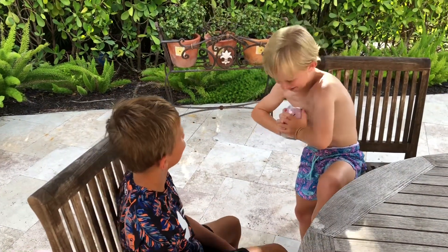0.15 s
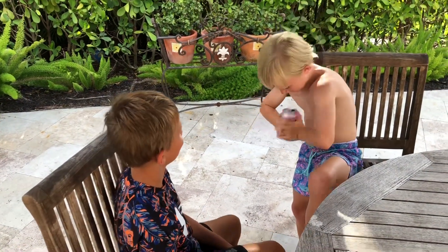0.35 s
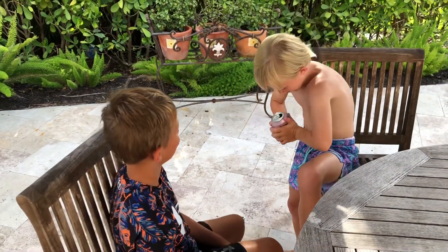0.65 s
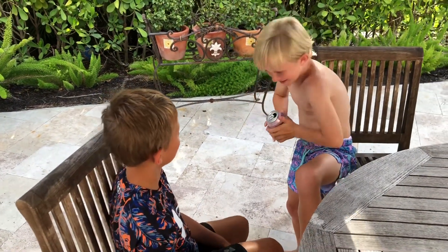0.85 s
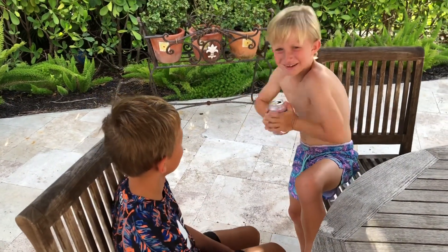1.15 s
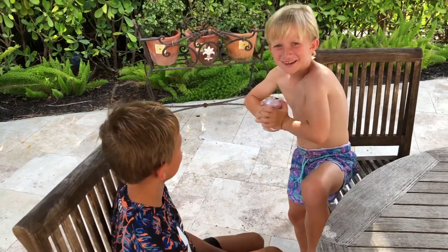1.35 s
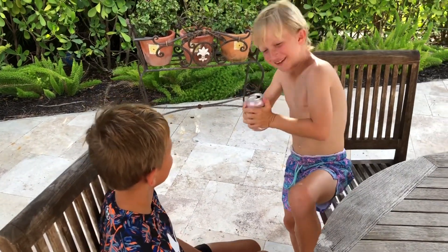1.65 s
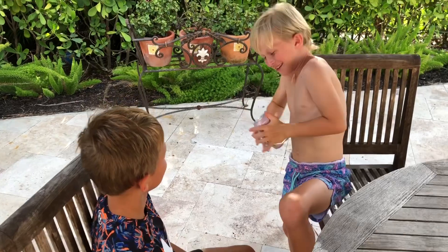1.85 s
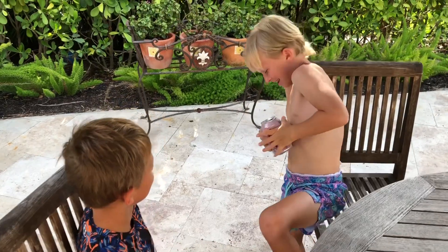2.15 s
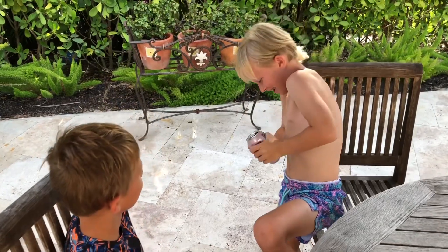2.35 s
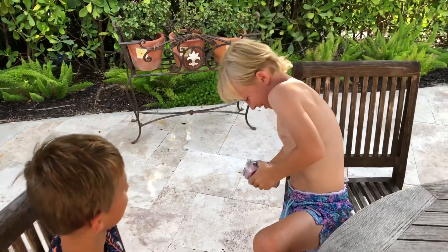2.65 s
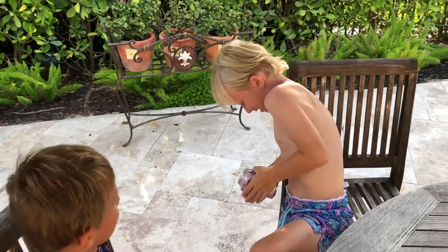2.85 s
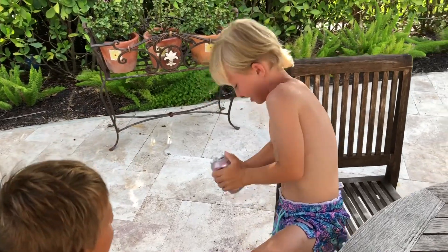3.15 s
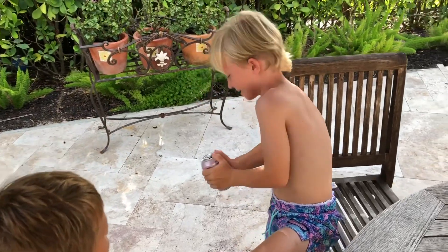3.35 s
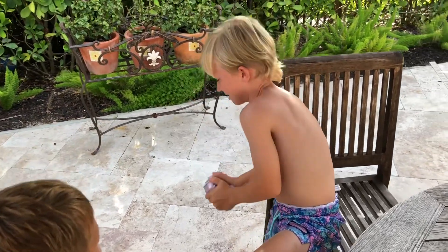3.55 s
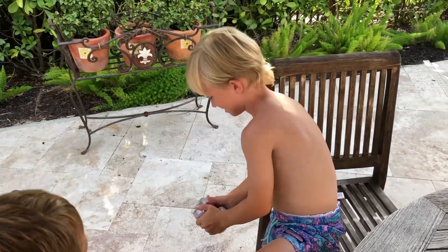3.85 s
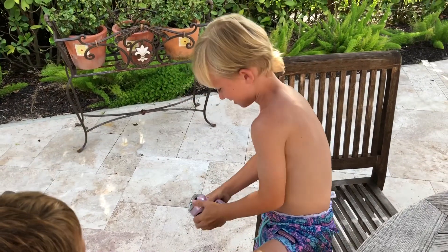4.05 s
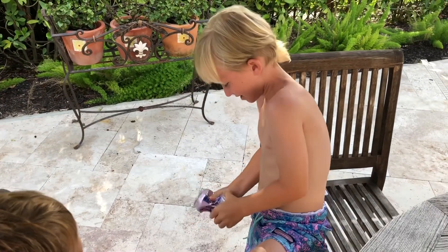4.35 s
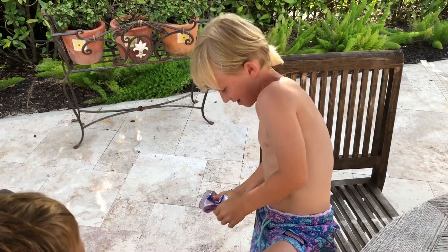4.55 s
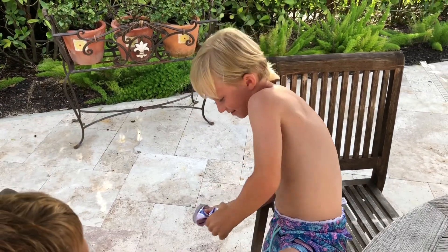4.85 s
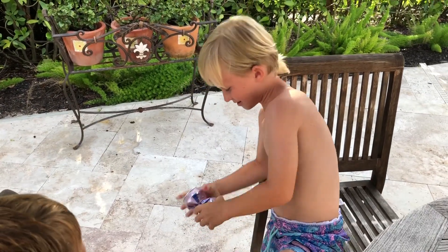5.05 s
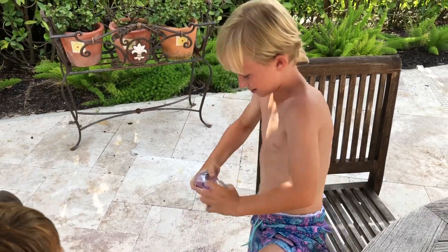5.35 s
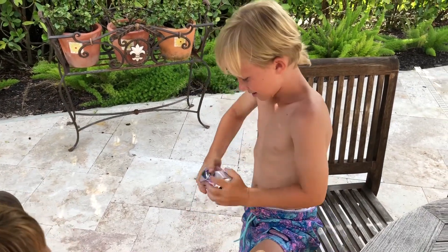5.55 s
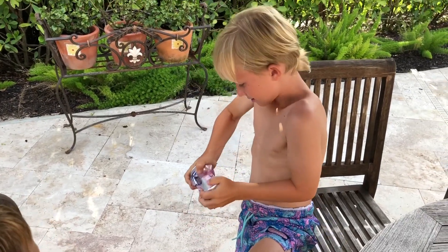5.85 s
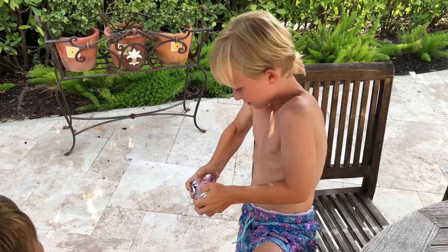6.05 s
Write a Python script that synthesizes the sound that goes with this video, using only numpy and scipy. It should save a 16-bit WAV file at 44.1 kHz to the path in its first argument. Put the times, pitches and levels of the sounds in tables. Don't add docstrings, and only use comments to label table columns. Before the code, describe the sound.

Outdoors on a paved patio, fingers buckle a light aluminium can. Irregular sharp clicks and crinkles thicken into a loud crackling crush, with dented panels ringing briefly and a short rub of skin on metal. After a gap the flattened can is folded with quick snaps, then only small ticks and a few pops remain. Phone pickup from a couple of metres, slight yard echo, distant motor hum, rumble, wind thumps and thin birdsong.

```python
import sys
import numpy as np
from scipy import signal
from scipy.fft import rfft, irfft
from scipy.io import wavfile
from scipy.ndimage import uniform_filter1d

SR = 44100
rng = np.random.default_rng(int(sys.argv[2]) if len(sys.argv) > 2 else 0)


def boost(x):
    u = np.asarray(x, float) / 20
    return 10 ** u


def wrap_up_sound(samples):
    columns = np.atleast_2d(samples).T
    tamed = np.clip(columns, -1, 1)
    steps = np.round(tamed * 32767).astype(np.int16)
    wavfile.write(sys.argv[1], SR, steps)


N = 273759
LEAD_S = .1
LEVEL_SAMPLES = 300

# start in seconds, tear length in seconds, body level in dB,
# edge level in dB, level of the air in the can in dB.
PRESSING_BUCKLES = [(-.012, .009, -31, -21.5, -60), (.0655, .014, -41, -35, -50),
                    (.082, .011, -36, -27.5, -40.5), (0.1400, 0.0064, -33, -21, -36),
                    (0.3662, 0.0028, -42, -23.5, -41), (.8249, .0052, -27, -22.5, -50),
                    (.8688, .007, -38, -41, -41), (.9137, 0.0083, -33, -34, -35.5),
                    (1.0856, 0.0059, -34, -32, -46), (1.3082, .013, -46.5, -72, -42),
                    (1.3316, .0056, -52, -39, -66), (1.3774, 0.0051, -44.5, -27.5, -38.5),
                    (1.4238, .007, -32, -21, -27.5), (1.5427, 0.011, -35, -30, -36),
                    (1.7625, .015, -27, -17.5, -32), (1.938, 0.021, -27.5, -29.5, -54.5)]
CRUSHING_BUCKLES = [(2.0685, 0.015, -25.5, -36, -60), (2.0885, 0.016, -44, -22.5, -40),
                    (2.1025, .019, -21, -29, -25), (2.1192, .012, -21.5, -22.5, -33),
                    (2.1507, 0.0078, -33, -37, -41), (2.1614, .027, -30, -32.5, -40),
                    (2.1842, .017, -28, -27, -35), (2.2412, .01, -23, -21.5, -33),
                    (2.259, 0.039, -22, -28, -31), (2.282, .02, -36, -34, -43),
                    (2.4014, .01, -40, -33.5, -45.5), (2.457, .02, -31, -48, -60),
                    (2.4606, .014, -19, -21.5, -31), (2.477, .023, -31, -21, -32),
                    (2.4944, .012, -38, -38, -40)]
FOLDING_BUCKLES = [(3.2274, 0.019, -32.5, -25.5, -35.5), (3.2665, .0042, -51, -19, -59.5),
                   (3.2767, .021, -37, -31, -39), (3.3284, 0.008, -22, -52, -23),
                   (3.37, .016, -31, -44, -33), (3.3787, 0.0086, -31, -31, -32),
                   (3.4225, .0087, -59, -33.5, -65), (3.5012, 0.017, -37, -30.5, -42),
                   (4.3066, .019, -52, -29, -47.5), (5.12, .015, -59, -59, -75),
                   (5.5905, .008, -65, -54, -74.5), (6.1134, .0064, -46, -35, -65)]
TOP_DROPS_DB = (9, 10, 15.5)
# start in seconds, body level in dB,
# crease level in dB.
CRINKLES = [(.0858, -45, -30), (1.766, -50.5, -30), (1.7944, -40, -32), (1.9263, -40, -49),
            (2.0078, -38, -43), (2.2525, -45.5, -31), (2.2695, -45, -36), (2.5727, -50, -34),
            (3.231, -34.5, -31.5), (3.5802, -54, -42), (-.012, -56, -30), (.1406, -40, -22),
            (3.3785, -50, -35), (3.5011, -50, -39), (4.3075, -44, -29), (6.1134, -55, -34),
            (1.3082, -56, -47), (1.3316, -60, -39), (2.1507, -44, -28), (2.0685, -45, -33)]
TICKS = [(.258, -58, -55), (.356, -35, -60), (.4067, -41, -58), (.437, -38.5, -60), (.543, -44, -62),
         (.5, -50, -64), (.8, -53, -62), (.8169, -42, -50), (.982, -45, -77), (1.0516, -43, -52),
         (1.1828, -38.5, -51.5), (1.2228, -52, -53), (3.011, -49.5, -71), (3.69, -51, -61),
         (3.727, -56, -58), (4.03, -63, -61), (4.178, -61, -60.5), (4.2883, -46, -74), (4.4148, -43, -62),
         (4.5834, -58, -57.5), (5.8379, -42, -49)]
NAIL_GRAZES = [(.79, -63, -63), (2.9504, -53, -60), (3.3163, -42, -62.5), (3.3561, -58, -66),
               (3.6343, -46, -58), (3.8521, -48.5, -54), (5.013, -52, -59), (5.38, -71, -62)]
ZONES_HZ = (1500, 4500, 8500, 13500)
ZONE_WIDTHS_HZ = (2250, 3500, 4500, 5000)

# start in seconds, pitch in Hz, level in dB.
PANELS = [(.0855, 2620, -39), (0.14, 2830, -32), (0.3663, 1560, -40), (.8249, 1593, -24.5),
          (.9141, 1640, -37.5), (1.7624, 3030, -25), (1.764, 2490, -28), (1.796, 1640, -37),
          (1.9263, 1490, -41), (1.938, 1210, -23.5), (2.0889, 1940, -32), (2.1033, 1184, -22),
          (2.1495, 1134, -34), (2.1612, 1685, -26.5), (2.1842, 1580, -31.5), (2.2419, 2240, -20.5),
          (2.2516, 1060, -24.5), (2.259, 1664, -34), (2.283, 1030, -38), (2.4023, 1970, -36),
          (2.4608, 1176, -14.5), (2.4948, 1230, -24.5), (3.231, 1650, -29.5), (3.2668, 2750, -38),
          (3.2771, 980, -33), (3.328, 846, -29), (3.37, 1125, -32), (3.3787, 1710, -40),
          (4.2885, 1640, -44), (6.1134, 2840, -36)]
# start in seconds, pitch in Hz, level in dB.
FACETS = [(.0655, 3080, -35), (.082, 3160, -29.5), (.085, 3370, -29.5), (.082, 11000, -33),
          (.8247, 5800, -27.5), (1.087, 1550, -35.5), (1.0858, 5700, -32), (1.183, 1710, -38.5),
          (1.3771, 9370, -35), (1.5428, 1630, -32), (1.5425, 4700, -35), (1.7626, 2460, -18.5),
          (1.7645, 8300, -21), (1.765, 4940, -26.5), (1.794, 4090, -34.5), (1.94, 5280, -32.5),
          (2.0889, 10700, -31), (2.0685, 3190, -28.5), (2.0685, 8000, -29), (2.0889, 3950, -30.5),
          (2.12, 1400, -18), (2.1195, 7070, -27.5), (2.4606, 9400, -26), (2.4768, 900, -18.5),
          (2.4768, 10700, -24.5), (3.2665, 7360, -24.5), (3.379, 4500, -28.5), (3.3788, 10040, -32.5),
          (4.307, 9630, -27), (6.1133, 3444, -19)]
# start in seconds, pitch in Hz, level in dB.
SETTLING_DENTS = [(.150, 2130, -40), (.3775, 1690, -44), (.416, 480, -45), (.868, 2130, -43),
                  (.9145, 4270, -41), (1.0865, 2690, -38), (1.332, 5850, -42), (1.392, 720, -48),
                  (1.436, 1100, -43), (1.443, 680, -42), (1.5425, 1070, -38), (1.559, 4700, -43),
                  (1.782, 4270, -38), (1.7945, 2130, -38), (2.1195, 1050, -25), (2.139, 6800, -42),
                  (2.245, 450, -38), (2.264, 450, -37), (2.271, 1070, -32), (2.281, 2600, -38),
                  (2.299, 440, -42), (2.299, 1070, -41), (2.363, 1690, -49), (2.4605, 1700, -24),
                  (2.479, 440, -31), (2.4775, 2100, -27), (2.511, 850, -38), (2.518, 1050, -41),
                  (2.528, 1300, -43), (2.538, 850, -45), (2.549, 2050, -45), (2.556, 1250, -46),
                  (2.562, 950, -41), (2.583, 1250, -46), (3.232, 450, -38), (3.231, 2800, -33),
                  (3.279, 1250, -37), (3.3283, 1700, -25), (3.354, 850, -39), (3.380, 450, -32),
                  (3.3788, 2800, -41), (3.502, 4270, -36), (4.3068, 1750, -40), (4.3075, 6500, -30),
                  (4.309, 7400, -33), (4.324, 6200, -47), (4.326, 3450, -39), (4.333, 3450, -37),
                  (6.1235, 3400, -41), (6.132, 3450, -41), (6.1135, 5500, -35), (.0665, 6200, -38),
                  (.8685, 7800, -36), (3.379, 13500, -40), (3.4225, 13500, -42)]
# start in seconds, pitch in Hz, level in dB.
FLIPS = [(.1406, 4000, -19.5), (.3664, 11000, -24.5), (2.1196, 1800, -24), (2.2418, 2400, -25),
         (2.4612, 2600, -21), (3.3787, 6000, -32), (4.3074, 4000, -24), (2.1045, 10700, -30)]
# start in
# seconds, pitch in Hz, level in dB, # t60 in seconds.
PINGS = [(.916, 1630, -35.5, .11), (2.462, 2085, -23.5, .05), (4.309, 3580, -30, 0.064),
         (4.416, 484, -45, 0.08), (4.5829, 2030, -48, 0.017), (2.9501, 457, -40.5, .022),
         (3.356, 543, -38, .032), (3.6333, 506, -38, .03), (3.8526, 470, -43.5, .047),
         (5.8372, 403, -44, .04), (2.0081, 2256, -27, 0.0091), (4.3073, 3560, -14, .009),
         (2.1844, 950, -28, .015), (2.1034, 1800, -25, .012), (3.3284, 2050, -30, .007),
         (3.2769, 3480, -33, .015), (1.4238, 1000, -34, .02), (2.0889, 1000, -38, .02),
         (1.7626, 1100, -30, .012), (1.7626, 6800, -21, .008), (2.1612, 2900, -33, .01),
         (3.3787, 4700, -36, .006), (1.3085, 1000, -43, .03), (5.838, 950, -42, .03),
         (1.5422, 9600, -28.5, .008), (2.2433, 8900, -23, .01), (2.0081, 1800, -33, .01),
         (6.1137, 6300, -32, .008), (6.118, 3460, -38, .09)]
# start in seconds, pitch in Hz,
# level in dB, t60 in seconds.
MORE_PINGS = [(.1402, 1750, -38, .01), (.082, 2300, -38, .01), (.066, 1600, -46, .012),
              (1.3085, 6000, -46, .008), (1.552, 1300, -48, .02), (1.434, 1700, -48, .02),
              (1.7626, 3750, -26, .008), (2.1195, 2300, -30, .008), (2.161, 2300, -36, .01),
              (2.242, 1000, -27, .012), (2.2418, 1750, -29, .008), (3.277, 720, -42, .02),
              (3.3285, 720, -29, .02), (3.3285, 2900, -39, .006), (3.3285, 2350, -34, .006),
              (3.371, 720, -41, .02), (3.379, 1750, -35, .01), (3.502, 2950, -42, .01),
              (3.634, 720, -46, .02), (4.289, 480, -50, .03), (4.2885, 1600, -39, .014),
              (4.3072, 3000, -24, .006), (4.415, 750, -50, .02), (2.403, 1000, -48, .015),
              (2.402, 2950, -48, .01), (1.795, 900, -47, .015), (1.087, 470, -44, .025),
              (3.266, 480, -51, .025)]
# start in seconds, low edge in Hz, high edge in Hz,
# level in dB, t60 in seconds.
SHIVERS = [(.146, 2600, 15000, -29, .12), (.375, 2200, 6500, -42, .12), (1.549, 4200, 15000, -41, .16),
           (1.769, 3300, 5400, -37, .08), (2.29, 1900, 2700, -46, .3), (3.369, 5400, 15000, -36, .05),
           (4.314, 4000, 15000, -40, .2), (-.03, 5200, 8000, -39, .25), (.825, 5500, 9500, -38, .1),
           (.141, 3300, 5400, -27, .06), (.16, 4000, 5800, -42, .4), (4.308, 2800, 4500, -27, .05),
           (4.32, 3000, 4300, -42, .15), (2.262, 900, 2700, -35, .1), (2.295, 900, 2600, -45, .35),
           (2.5, 4000, 15000, -46, .2), (1.542, 10000, 15500, -40, .1), (.37, 9500, 15500, -40, .12),
           (4.995, 6000, 12000, -62, .3), (4.04, 1200, 4000, -58, .6), (3.335, 450, 1100, -42, .3)]
# loudest moment in seconds, level in dB, rise in seconds,
# fall in seconds.
SLIDES = [
    (2.54, -44, .02, .05),
    (2.95, -70.5, .3, .4),
    (3.52, -70, .01, .3),
    (4.1, -54, .05, .04),
    (4.19, -60.5, 0.076, .035),
    (5.025, -56, .035, .025),
]

# delay in seconds, level in dB.
NEAR_ECHOES = [(.0022, -18.5), (.0045, -17.5), (0.0111, -22.5)]
# low edge in Hz, high edge in Hz, t60 in seconds, share of amplitude.
YARD_BANDS = [(349, 1800, 0.54, 1.3), (2680, 7600, 0.42, 1.2), (6530, 18000, 0.33, 1.1),
              (4200, 5500, .5, 1.1), (1400, 2700, .5, .8)]

# start in seconds, end in seconds, start pitch in Hz, end pitch in Hz,
# level in dB.
WHISTLES = [
    (0.637, .83, 6070, 6150, -69.5),
    (1.175, 1.42, 6070, 5900, -64),
    (5.255, 5.37, 5750, 5760, -69),
    (5.35, 5.48, 6430, 6320, -72),
    (6.077, 6.125, 5770, 5900, -58),
    (6.118, 6.4, 5930, 6000, -46.5),
]
# delay in seconds, level in dB.
HEDGE_ECHOES = [(.013, -2), (.031, -4), (.052, -7)]
# time in seconds, peak level in dB, pitch in Hz,
# length in seconds.
BUMPS = [
    (1.798, -32.5, 78, 0.02),
    (2.056, -41.5, 65, 0.14),
    (2.805, -31.5, 123.6, 0.019),
    (4.835, -32.5, 99.3, 0.022),
    (5.244, -39.5, 65, .035),
    (5.95, -42.5, 151, 0.019),
    (5.982, -36.5, 83, 0.037),
    (6.138, -38, 96.7, 0.029),
]
# frequency in Hz, level in dB per Hz.
TOWN_SPECTRUM = [(15, -36), (25, -8), (114, -0.5), (142, -4.5), (177, -8), (288, -9.5), (480, -10),
                 (700, -12), (1030, -14.5), (1390, -19.5), (1880, -24.5), (2330, -29.5), (3910, -33),
                 (6210, -35), (7110, -39), (15200, -46.5), (16500, -56)]
# time in seconds, level in dB.
RUMBLE_DRIFT = [(0.0, -57), (0.47, -52), (0.62, -58.5), (0.79, -53.5), (1.24, -51), (1.47, -49.5),
                (1.57, -50.5), (1.99, -45), (2.14, -49.5), (3.29, -50.5), (3.61, -54), (4.03, -52),
                (4.13, -54), (5.08, -51), (5.69, -52.5), (6.21, -42.5)]
# centre in Hz, width in Hz, level in dB.
MOTOR = [(116.7, 9.6, -53.5), (78, 14, -55), (1060, 30, -66)]


def band(x, low_hz, high_hz, order=2):
    sos = signal.butter(order, [low_hz, min(high_hz, .47 * SR)], "band", fs=SR, output="sos")
    return signal.sosfilt(sos, x)


def level(x, db):
    return x * boost(db) / np.sqrt(np.mean(x ** 2))


def decay(t, t60_s):
    return np.exp(-np.log(1000) * t / t60_s)


def walk(rate_hz):
    k = int(SR / rate_hz)
    steps = np.repeat(rng.standard_normal(N // k + 1), k)
    return 4.2 * uniform_filter1d(uniform_filter1d(steps, k), k)[:N]


def add(track, s, x):
    i = int((s + LEAD_S) * SR)
    track[i:i + len(x)] += x


def can():
    direct, around = np.zeros((2, N + SR))
    snaps = buckle_snaps() + crease_snaps()
    for (s, length_s, *zones_db), noise in zip(snaps, rng.standard_normal((len(snaps), 1024))):
        snap, colour = tear(length_s, zones_db, noise)
        add(direct, s + .0004, boost(1.5) * snap)
        add(around, s, colour)
    for s, hz, db, t60_s in air_rings() + wall_rings():
        add(direct, s, ring(hz, t60_s, db + 0.5))
        add(around, s, ring(hz, 0.6 * t60_s, db - 3.5 - hz / 800))
    return direct, around


def buckle_snaps():
    body_share, crease_db = 0.35, -4
    top_per_db, usual_edge_db = .35, -26
    snaps = []
    for table, drop_db in zip((PRESSING_BUCKLES, CRUSHING_BUCKLES, FOLDING_BUCKLES), TOP_DROPS_DB):
        for s, length_s, body_db, edge_db, _ in table:
            middle_db = body_share * body_db + (1 - body_share) * edge_db + crease_db
            top_db = edge_db - drop_db + top_per_db * np.clip(edge_db - usual_edge_db, -12, 2)
            snaps.append((s, length_s, body_db, middle_db, edge_db, top_db))
    return snaps


def crease_snaps():
    snaps = []
    for table, length_s, fall_db in ((CRINKLES, .011, 15), (TICKS, .012, 17.5), (NAIL_GRAZES, 0.018, 7)):
        for s, body_db, crease_db in table:
            snaps.append((s, length_s, body_db, crease_db, crease_db - fall_db, crease_db - 2 * fall_db))
    return snaps


def tear(length_s, zones_db, noise, count=8):
    n = len(noise)
    t = np.arange(n) / SR
    crack = 0.013 / length_s * np.exp(-t / 0.00091)
    trail = .5 * np.exp(-t / (0.33 * length_s))
    burst = noise * (1 - np.exp(-t / .0002)) * (crack + trail)
    burst[count] += 2.3 * (0.0079 / length_s) ** 2
    burst /= np.sqrt(np.sum(burst ** 2))
    hz = np.arange(n + 1) * SR / (2 * n) + 1
    density_db = np.array(zones_db) - 10 * np.log10(2 * np.array(ZONE_WIDTHS_HZ) / SR / LEVEL_SAMPLES)
    colour_db = np.interp(np.log(hz), np.log(ZONES_HZ), density_db)
    colour_db = colour_db - 10 * np.log10(1 + (900 / hz) ** 4)
    cepstrum = irfft(colour_db * np.log(10) / 20)
    cepstrum[1:n] *= 2
    cepstrum[n + 1:] = 0
    colour = np.exp(rfft(cepstrum))
    return irfft(rfft(burst, 2 * n) * colour), irfft(colour)


def air_rings():
    air_hz, spread, t60_s, lag_s = 490, 0.05, 0.03, .0005
    buckles = PRESSING_BUCKLES + CRUSHING_BUCKLES + FOLDING_BUCKLES
    pitch = air_hz * (1 + spread * rng.uniform(-1, 1, len(buckles)))
    return [(row[0] + lag_s, hz, row[4], t60_s) for row, hz in zip(buckles, pitch)]


def wall_rings():
    rings = [(s, hz, db, .05 * (1100 / hz) ** 0.99) for s, hz, db in PANELS]
    rings += [(s, hz, db, 0.01) for s, hz, db in FACETS]
    rings += [(s, hz, db, .025 * (1100 / hz) ** .4) for s, hz, db in SETTLING_DENTS]
    rings += [(s, hz, db, .002) for s, hz, db in FLIPS]
    return rings + PINGS + MORE_PINGS


def ring(hz, t60_s, db):
    t = np.arange(3000) / SR
    wall_rise_s, air_rise_s, air_edge_hz = .00043, .003, 640
    rise_s = min(wall_rise_s, .1 * t60_s) + air_rise_s / (1 + (hz / air_edge_hz) ** 8)
    fade = decay(t, t60_s) * (1 - np.exp(-t / rise_s))
    partner = 0.35 * fade * np.sin(2 * np.pi * 1.1 * hz * t)
    y = fade * (np.sin(2 * np.pi * hz * t) + partner)
    return y * boost(db) / np.sqrt(np.sum(y ** 2) / LEVEL_SAMPLES)


def yard(direct, around):
    t = np.arange(SR // 2) / SR
    tail = np.zeros(len(t))
    for low_hz, high_hz, t60_s, share in YARD_BANDS:
        tail += share * band(rng.standard_normal(len(t)), low_hz, high_hz) * decay(t, t60_s)
    tail *= (1 - np.exp(-t / 0.0016)) * (1 + 2.6 * np.exp(-t / 0.014))
    tail *= boost(-9.5) / np.sqrt(np.sum(tail ** 2))
    near = np.zeros(1500)
    near[0] = 1
    for delay_s, db in NEAR_ECHOES:
        near[int(delay_s * SR)] += boost(db)
    start = int(LEAD_S * SR)
    far = signal.fftconvolve(around, tail)[start:][:N]
    return far + signal.fftconvolve(direct, near)[start:][:N]


def shivers(t):
    out = np.zeros(N + SR)
    age = t[:SR // 4]
    noises = rng.standard_normal((len(SHIVERS), len(age)))
    for (s, low_hz, high_hz, db, t60_s), noise in zip(SHIVERS, noises):
        grains = noise * np.abs(noise[::-1]) ** .6
        rattle = level(band(grains, low_hz, high_hz), db)
        add(out, s, rattle * (1 - np.exp(-age / .002)) * decay(age, t60_s))
    return out[int(LEAD_S * SR):][:N]


def slide(t):
    gain = np.zeros(N)
    for s, db, rise_s, fall_s in SLIDES:
        gain += boost(db) * np.exp(-np.abs((t - s) / np.where(t < s, rise_s, fall_s)) ** 1.4)
    slip_db = 3.0 * rng.exponential(size=N) + 1.3 * walk(110)
    slips = rng.standard_normal(N) * boost(slip_db)
    return gain * level(band(slips, 1300, 6000, order=1), -3)


def bumps(t):
    rough = level(band(rng.standard_normal(N), 110, 280), -9.0)
    out = np.zeros(N)
    for s, db, hz, length_s in BUMPS:
        swell = np.exp(-(2 * (t - s) / length_s) ** 2)
        out += boost(db) * swell * (np.cos(2 * np.pi * hz * (t - s)) + rough)
    return out


def birds(t):
    out = np.zeros(N)
    waver = 1 + .002 * walk(120)
    flutter = boost(1.1 * walk(200) - 1.5)
    for start, end, start_hz, end_hz, db in WHISTLES:
        part = np.clip((t - start) / (end - start), 0, 1)
        hz = (start_hz + (end_hz - start_hz) * part) * waver
        phase = 2 * np.pi * np.cumsum(hz) / SR
        out += boost(db + 4.5) * np.sin(np.pi * part) ** .35 * np.sin(phase)
    out = out * flutter
    echoes = sum(boost(db) * np.roll(out, int(delay_s * SR)) for delay_s, db in HEDGE_ECHOES)
    return boost(-4) * (out + echoes)


def town(t):
    out = np.zeros(N)
    swell_db = .12 * walk(1)
    spectrum_hz, spectrum_db = np.transpose(TOWN_SPECTRUM)
    rumble_db = np.interp(t, *np.transpose(RUMBLE_DRIFT))
    rumble_db = rumble_db - rumble_db.mean()
    for hz in 25 * 2 ** np.arange(0, 9.4, 1 / 3):
        db = np.interp(np.log(hz), np.log(spectrum_hz), spectrum_db) + 10 * np.log10(hz)
        flicker_db = walk(11) / (1 + hz / 2000)
        db = db + swell_db + flicker_db + rumble_db / (1 + (hz / 170) ** 2)
        out += boost(db) * level(band(rng.standard_normal(N), hz / 1.13, hz * 1.13), 0)
    return level(out, -46)


def motor():
    out = np.zeros(N)
    for hz, width_hz, db in MOTOR:
        out += level(band(rng.standard_normal(N), hz - width_hz / 2, hz + width_hz / 2, order=1), db)
    return out


def scene():
    t = np.arange(N) / SR
    handling = yard(*can()) + shivers(t) + slide(t)
    background = bumps(t) + birds(t) + town(t) + motor()
    return (handling + background)[None]


def top_cut(x):
    return signal.sosfilt(signal.butter(12, 17090, fs=SR, output="sos"), x)


def record(dry):
    x = 1.5 * np.tanh(band(dry, 42, 20000, order=3) / 1.5)
    for stop_db, edge_hz in ((32, 15750), (60, 17000)):
        x = signal.sosfilt(signal.ellip(8, .3, stop_db, edge_hz, fs=SR, output="sos"), x)
    return top_cut(x)


dry = scene()
out = record(dry)
wrap_up_sound(out)
```